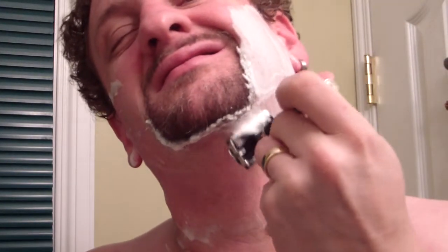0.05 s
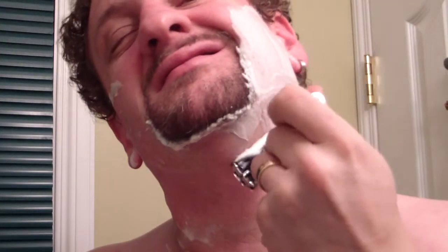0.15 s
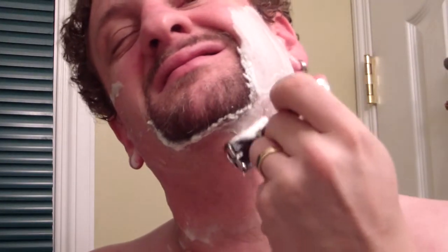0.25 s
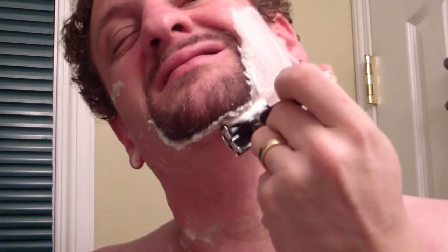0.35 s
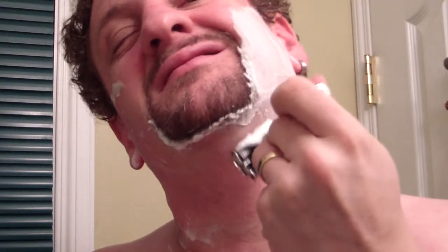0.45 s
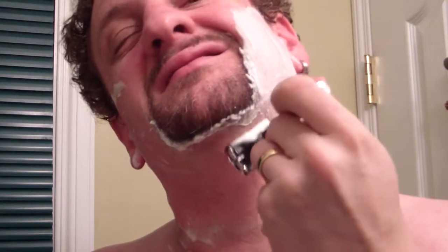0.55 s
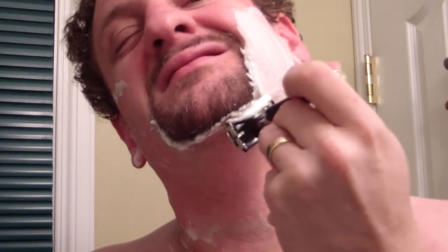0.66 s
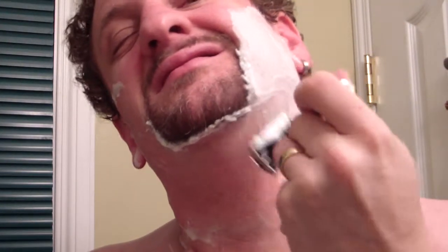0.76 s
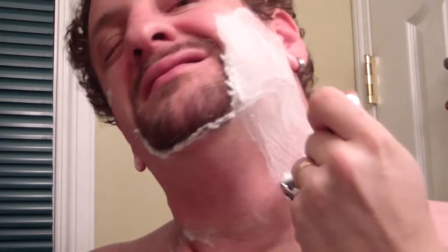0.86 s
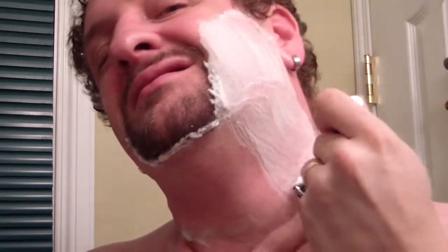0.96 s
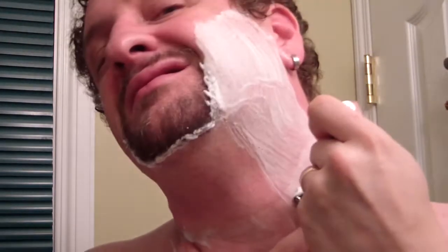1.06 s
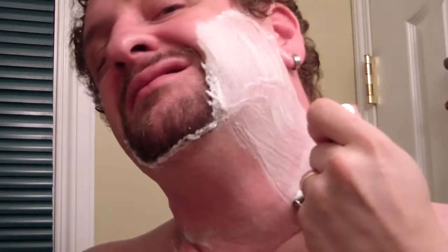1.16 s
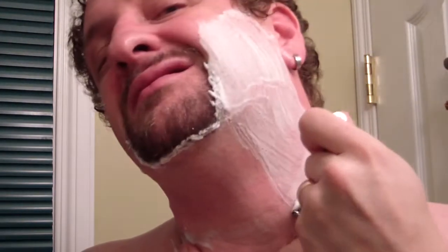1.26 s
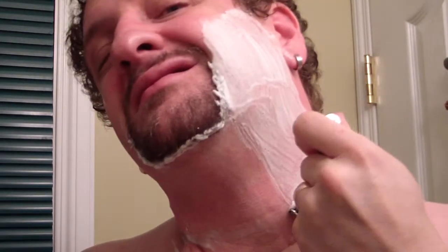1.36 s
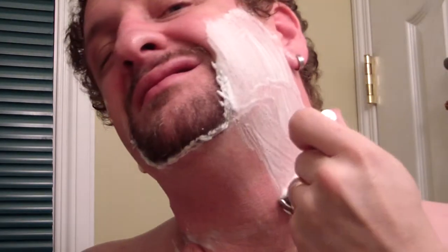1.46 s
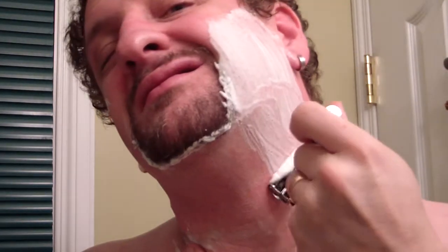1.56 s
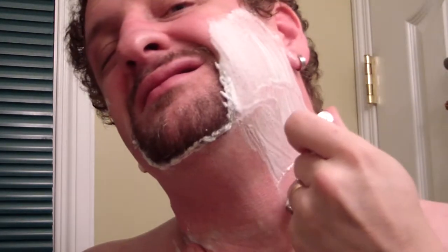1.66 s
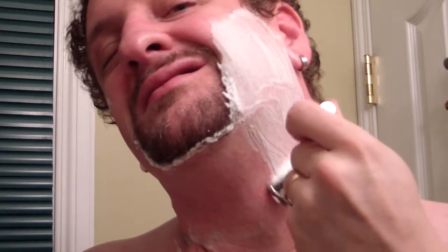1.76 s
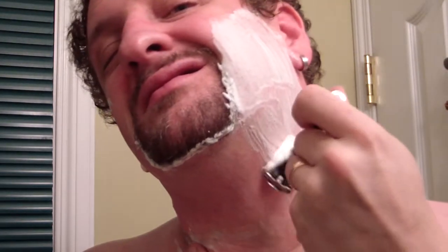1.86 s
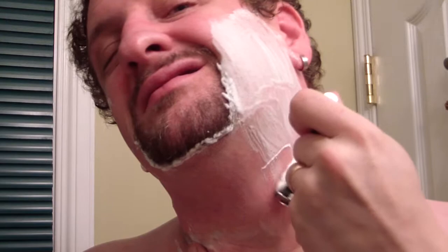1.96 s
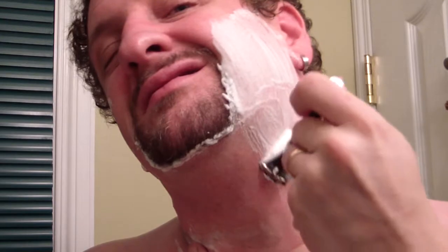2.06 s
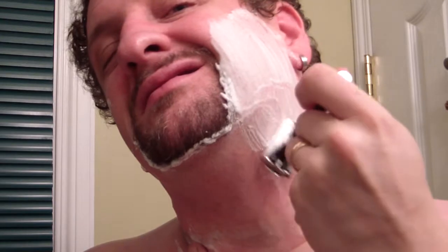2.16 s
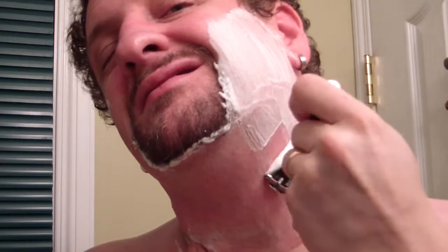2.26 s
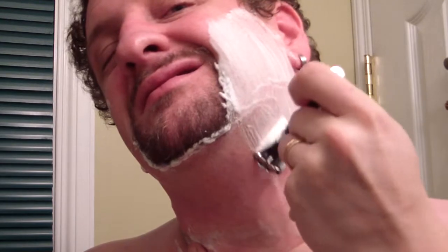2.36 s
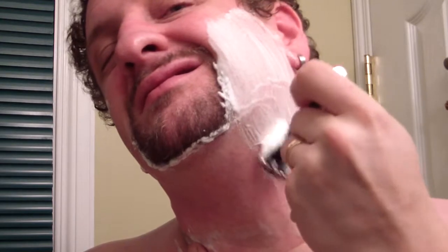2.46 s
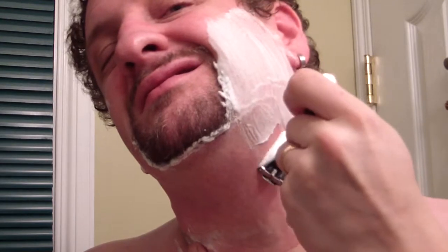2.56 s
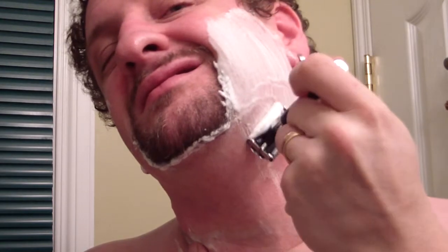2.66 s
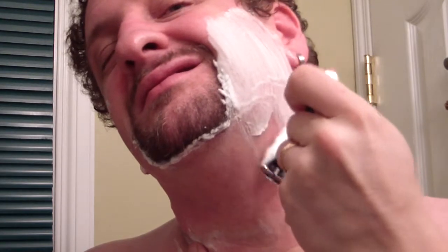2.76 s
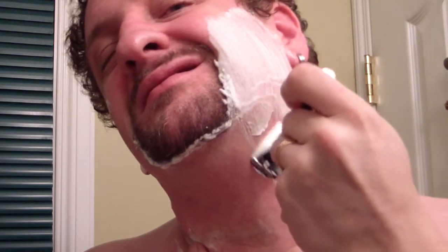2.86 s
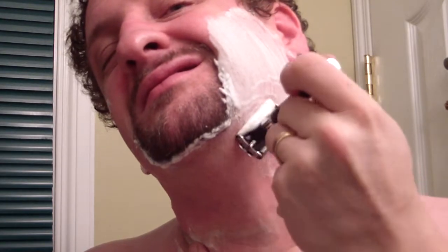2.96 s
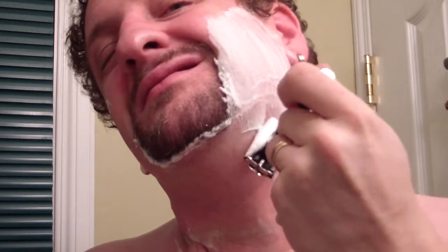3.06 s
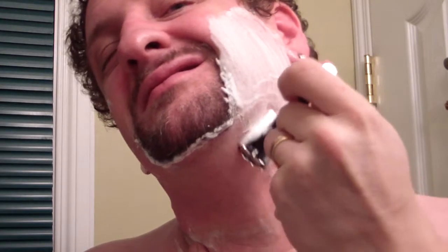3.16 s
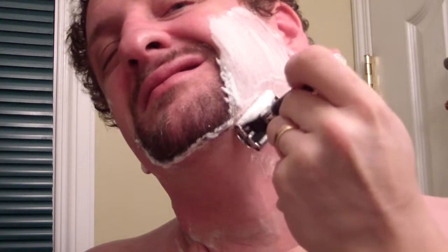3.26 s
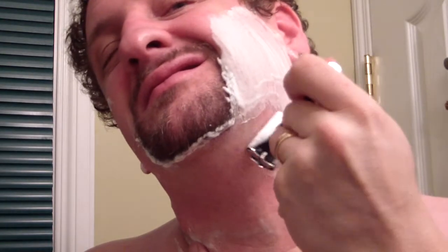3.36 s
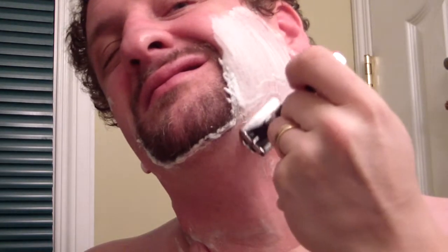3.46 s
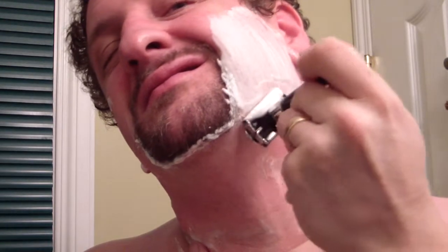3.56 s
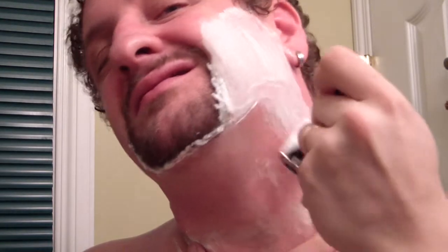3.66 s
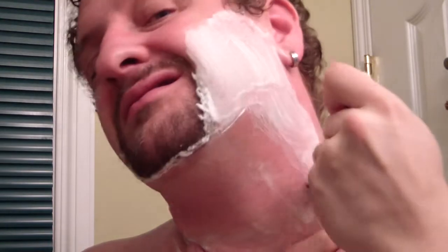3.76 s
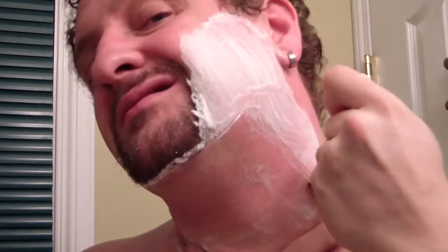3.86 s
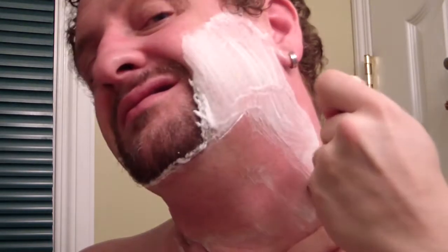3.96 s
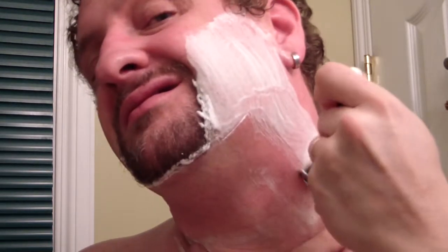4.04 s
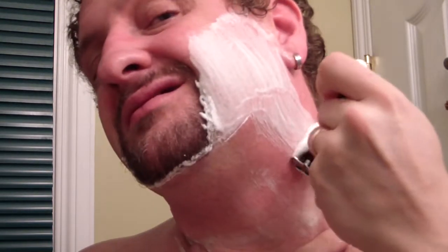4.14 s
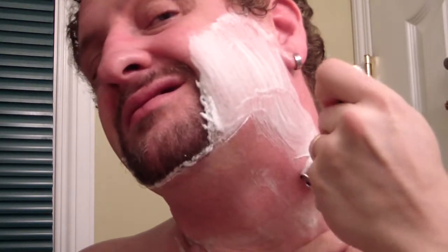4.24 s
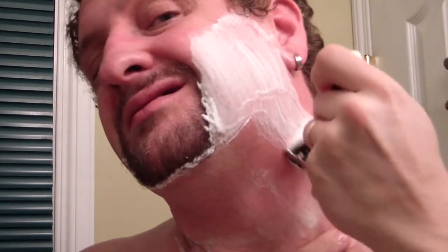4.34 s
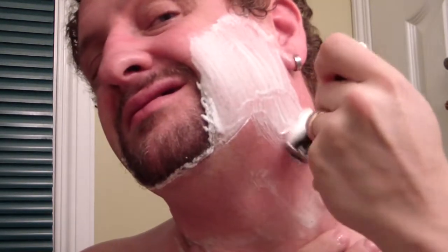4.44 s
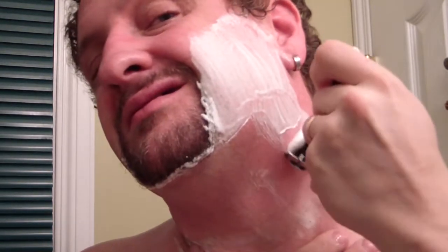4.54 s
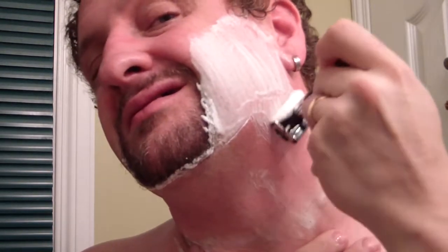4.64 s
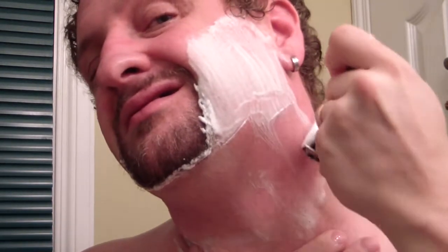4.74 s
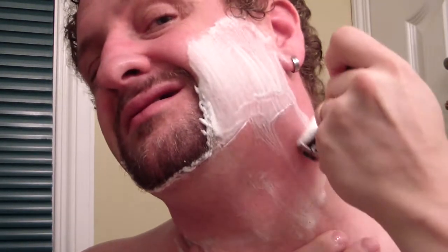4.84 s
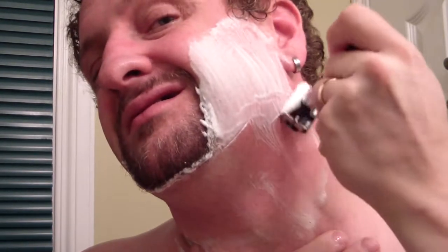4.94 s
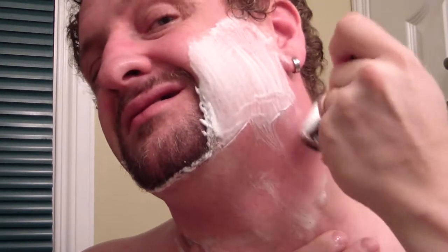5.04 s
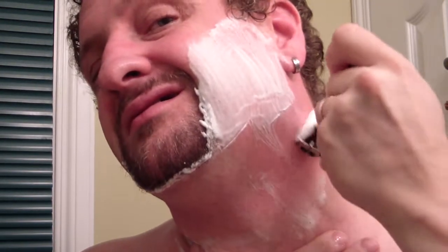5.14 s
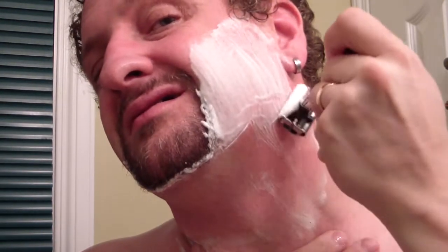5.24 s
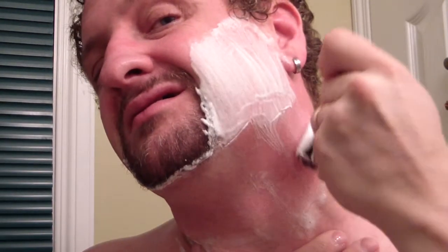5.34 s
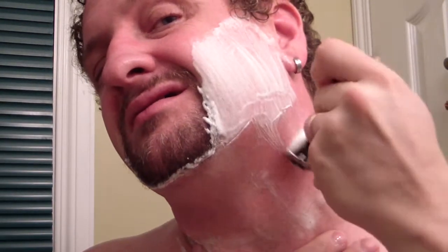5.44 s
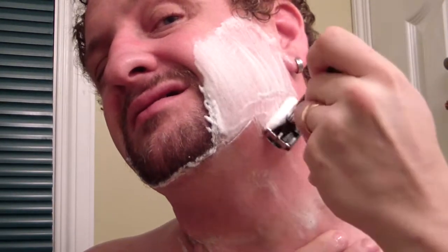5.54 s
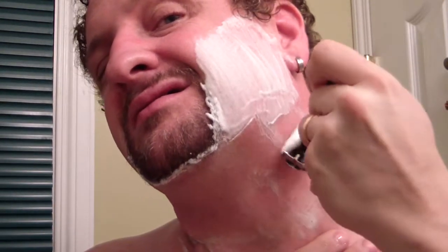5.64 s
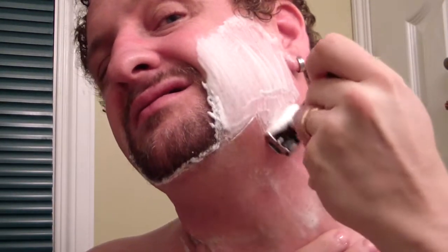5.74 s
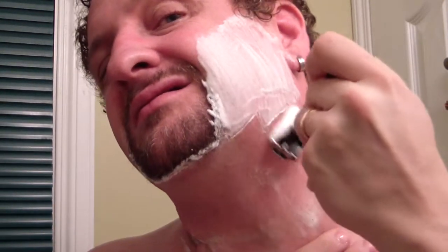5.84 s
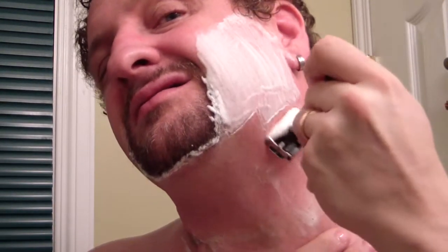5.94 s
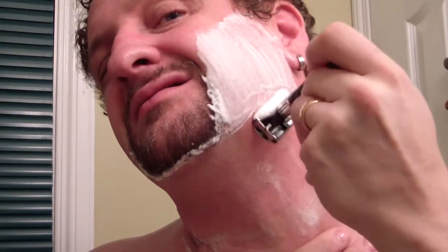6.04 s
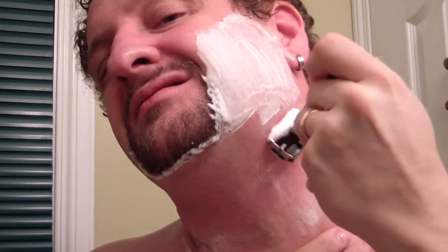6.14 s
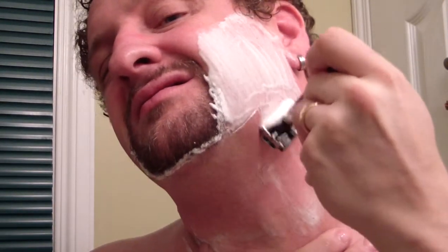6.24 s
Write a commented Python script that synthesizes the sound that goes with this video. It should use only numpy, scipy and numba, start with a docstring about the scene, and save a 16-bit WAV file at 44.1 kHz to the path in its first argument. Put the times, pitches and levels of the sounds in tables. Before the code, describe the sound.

Close to the microphone, a razor scrapes stubble in short gritty strokes, roughly three or four a second. A soft dull bump comes early, then two weaker, fizzier strokes and a short gap before brisk, stronger scraping resumes. Tiny lather pops tick between strokes. A small hard-walled bathroom adds short bright echoes over steady hiss, low rumble, mains hum and a faint distant engine.

```python
"""Wet shave in a small bathroom

A safety razor shaves lathered stubble in short strokes, close to the microphones.
Each cut hair is a click that rings the skin and the razor head; lather pops and crackles at set moments.
A dull bump, built from fading panel tones and rumble, sounds once, and the razor guard squeaks briefly.
The hard walls add short echoes; under it all lie microphone hiss, low rumble, mains hum and a far engine."""
import sys
import numpy as np
from scipy import signal
from scipy.fft import rfft, irfft
from scipy.io import wavfile
from scipy.ndimage import uniform_filter1d
from numba import njit

SR = 44100
rng = np.random.default_rng(int(sys.argv[2]) if len(sys.argv) > 2 else 0)


def dump(signal):
    """Clip the signal to [-1, 1] and save it as 16-bit WAV at the path in sys.argv[1]."""
    limited = np.clip(np.atleast_2d(signal).T, -1, 1)
    pcm = np.round(limited * 32767).astype(np.int16)
    wavfile.write(sys.argv[1], SR, pcm)


N = 277830
TIME = np.arange(N) / SR  # seconds
TOP_HZ = 15900  # where the recorder's treble cut begins

# razor strokes, lower in pitch on the slack neck; levels are relative:
# (start_s, attack_s, hold_s, rasp_db, crispness_db, skin_pitch_hz, skin_width_hz, fizz_against_hairs_db)
STROKE_TABLE = [ (-.035, 0.034, 0.034, -45, -39, 2680, 1000, -16),
                (0.263, 0.019, 0.11, -47, -43, 2750, 900, -21),
                (0.599, 0.046, 0.089, -44.5, -41, 2430, 1100, -18),
                (0.858, 0.059, 0.091, -55.5, -53, 1500, 1300, 5),
                (1.398, 0.14, 0.031, -53, -55, 2380, 1200, 2),
                (1.756, 0.087, 0.026, -52, -46, 2500, 1400, 1.5),
                (2.057, 0.018, 0.076, -45.5, -41.5, 2330, 600, -1.5),
                (2.333, 0.066, .040, -43.5, -40.5, 2360, 400, -5.5),
                (2.622, 0.05, 0.038, -40.5, -37, 2448, 451.3, 0),
                (2.902, .022, 0.079, -41, -38.5, 2260, 1190, -2),
                (3.196, 0.019, 0.065, -40, -41, 2350, 900, -16),
                (3.468, 0.021, 0.077, -43, -43.5, 2200, 900, -15),
                (4.035, 0.054, 0.055, -47.5, -48.5, 2070, 1100, 4),
                (4.329, 0.067, 0.036, -44.5, -45, 1965, 1300, 2),
                (4.598, 0.054, 0.036, -45, -43, 2172, 1000, -2),
                (4.890, 0.046, .030, -45.5, -45.5, 2080, 1000, 1),
                (5.192, 0.042, .038, -44.5, -49.5, 2000, 1124, 4),
                (5.488, 0.037, 0.044, -40, -46.5, 1760, 810, 1),
                (5.747, 0.037, 0.025, -43, -47, 1920, 1140, -7),
                (5.990, 0.073, .012, -43, -42.5, 2087, 1200, -3),
                (6.274, .020, .050, -43.5, -40, 2330, 900, -1), ]
# tone colour of crackling lather: (pitch_hz, relative_level_db)
LATHER_COLOUR = [(800, -12), (3000, -5), (5500, -9), (7500, -1.5), (9500, -3.5), (12500, 1.5),
                 (16000, -0.5)]


def undb(db):
    """Turn decibels into a plain gain."""
    return 10 ** (np.asarray(db) / 20)


def unit(x):
    """Scale to an rms (average strength) of 1."""
    return x / np.sqrt(np.mean(x ** 2))


def on_log_axis(points, size):
    """Read (hz, value) points at each frequency of a transform, evenly by pitch."""
    hz, value = np.transpose(points)
    return np.interp(np.log(np.fft.rfftfreq(size, 1 / SR) + 1), np.log(hz), value)


def colour(x, points):
    """Filter through (hz, db) points without sounding early, so that clicks keep their attack."""
    size = 2 * N
    # folding the cepstrum (transform of the log gain) forward in time makes the filter minimum-phase
    cepstrum = irfft(np.log(undb(on_log_axis(points, size))))
    cepstrum[1:N] *= 2
    cepstrum[N + 1:] = 0
    response = np.exp(rfft(cepstrum))
    return irfft(rfft(x, size) * response)[..., :N]


def noise_pair(likeness, size):
    """Make left and right noise with a given likeness (correlation) at each frequency."""
    c = np.clip(on_log_axis(likeness, size), -1, 1)
    weights = np.sqrt([(1 + c) / 2, (1 - c) / 2])
    mid, side = rfft(rng.standard_normal((2, size))) * weights
    return irfft([mid + side, mid - side], size)


@njit
def svf(x, hz, width):
    """State-variable band-pass: two linked stores pass energy back and forth, as in a resonator."""
    y, b, l = np.empty(len(x)), 0., 0.
    for i in range(len(x)):
        g, k = np.tan(np.pi * hz[i] / SR), width[i] / hz[i]
        v = (b + g * (x[i] - l)) / (1 + g * (g + k))
        b, l, y[i] = 2 * v - b, l + 2 * g * v, k * v
    return y


def resonate(x, hz, width_hz):
    """Ring one resonance, gain 1 at its centre; centre and width may move."""
    return svf(x, hz * np.ones(N), width_hz * np.ones(N))


def snaps(rate, spread_db):
    """Random clicks, `rate` a second on average, many small and a few large, at a steady mean power."""
    chance = rng.random(N)
    size = np.minimum(rng.exponential(size=N), 4.5)
    sign = rng.choice([-1, 1], N)
    clicks = (chance < rate / SR) * sign * undb(spread_db * size)
    power = uniform_filter1d(clicks ** 2, size=900)  # over about 20 ms
    return clicks / np.sqrt(np.abs(power) + 1e-9)


def strokes(attack_power=1.04, lift_s=.07, rasp_release_db_per_s=213, crisp_release_db_per_s=235,
            crisp_sag_db_per_s=5):
    """Each stroke presses in, holds, eases off and lifts; crispness sags as the blade clogs with lather."""
    rasp, crisp = np.zeros(N), np.zeros(N)
    for start, attack, hold, rasp_db, crisp_db, *_ in STROKE_TABLE:
        # the blade leaves the skin lift_s after the hand starts to ease off
        touching = (TIME >= start) & (TIME < start + attack + hold + lift_s)
        age = TIME[touching] - start
        press = np.minimum(age / attack, 1) ** attack_power
        easing = np.maximum(age - attack - hold, 0)
        rasp[touching] += press * undb(rasp_db - rasp_release_db_per_s * easing)
        crisp_now_db = crisp_db - crisp_sag_db_per_s * age - crisp_release_db_per_s * easing
        crisp[touching] += press * undb(crisp_now_db)
    return rasp, crisp


def skin_patch():
    """Skin pitch, its width and lather fizz under the blade, gliding from mid-stroke to mid-stroke."""
    start, attack, hold, _, _, *patch = np.transpose(STROKE_TABLE)
    middle = start + attack + hold / 2
    return [np.interp(TIME, middle, column) for column in patch]


def razor():
    """Hairs snap at the edge and ring the skin and the razor head; squeezed lather fizzes."""
    # ringing tones of the razor head: (pitch_hz, width_hz, relative_level_db)
    head_modes = [(1750, 24, -6), (1850, 20, -20), (2098, 11, -0.5), (2294, 45, -6.5), (2450, 44, 3.5),
                  (2860, 640, -3.5), (3050, 25, -7), (3175, 19, 0), (3573, 55, -4.5), (3920, 120, 0.5),
                  (4540, 210, -10)]
    # tone colour of a hair snapping: (pitch_hz, relative_level_db)
    snap_colour = [(500, -18.5), (1200, -13.5), (1800, -11.5), (2400, -4.5), (3000, 7), (4200, 5),
                   (5200, 2.5), (6300, 3.5), (7800, 2.5), (9500, 0), (13000, -1.5), (16000, -4)]
    rasp_gain, crisp_gain = strokes()
    skin_hz, skin_width, fizz_db = skin_patch()
    # stubble stands in tufts, so the snaps come in uneven bunches
    unevenness = unit(resonate(rng.standard_normal(N), 67, width_hz=120))
    tufts = unit(undb(0.78 * unevenness))
    hairs = tufts * snaps(rate=5000, spread_db=4)
    rub = undb(2) * tufts * rng.standard_normal(N)  # the guard rubs through the lather
    drag = unit(hairs + rub)
    tug = resonate(drag, skin_hz, width_hz=2100)  # the give of the skin softens each tug
    skin = resonate(tug, skin_hz, skin_width) / np.sqrt(skin_width)
    head = sum(undb(db) * resonate(tug, hz, width) for hz, width, db in head_modes)
    rasp = unit(unit(skin) + undb(-3.5) * unit(head))
    fizz = undb(fizz_db) * unit(colour(snaps(rate=5000, spread_db=5.5), LATHER_COLOUR))
    # the division keeps the total strength steady however much fizz there is
    crisp = (unit(colour(hairs, snap_colour)) + fizz) / np.sqrt(1 + undb(fizz_db) ** 2)
    return undb(-2.5) * rasp_gain * rasp + undb(0.84) * crisp_gain * crisp


def mic_noise():
    """Microphone hiss and low rumble: shaped noise that differs between left and right."""
    # tone colour of the hiss and rumble: (pitch_hz, relative_level_per_hz_db)
    hiss_colour = [(12, -32), (20, -1), (101, -5), (175, -7.5), (416, -12.5), (932, -17), (1630, -19.5),
                   (1870, -19.5), (2090, -21), (2330, -20), (2540, -20), (3750, -20), (4550, -22),
                   (7310, -23.5), (15500, -26)]
    # how alike left and right are: (pitch_hz, correlation)
    hiss_likeness = [(30, 0.27), (100, 0.15), (250, 0.088), (500, 0.049), (2000, 0.1), (12000, 0.06)]
    return undb(-48.7) * unit(colour(noise_pair(hiss_likeness, N), hiss_colour))


def mains_hum():
    """Mains hum near 120 and 240 Hz, with a few other low steady tones: noise through narrow resonances."""
    # hum and other low tones: (pitch_hz, first_resonance_width_hz, rms_level_db)
    hum_tones = [(80, 20, -63), (120.54, 2.8, -63.5), (120.1, 19, -61.5), (208.8, 4.8, -74.5),
                 (238, 3.2, -70.5), (422.5, 14, -74.5)]
    hum = np.zeros(N)
    for hz, width, db in hum_tones:
        narrow = resonate(rng.standard_normal(N), hz, width)
        hum += undb(db) * unit(resonate(narrow, hz, 2 * width))
    return hum


def lather(peak_s=0.00026, crackle_s=0.011, scatter=0.11):
    """A film of lather parts with a pop of a few tiny bubbles, then the foam crackles and fades."""
    # ticks as the razor lands and lifts: (start_s, relative_level_db, crackle_against_pop_db)
    tick_times = [(0.279, -41, -17), (.479, -53.5, -6), (.7615, -35.5, -18), (1.666, -49.5, -12.5),
                  (1.9273, -40.5, -16.5), (2.0732, -38, -24), (2.348, -47, -10), (2.5208, -47, -9),
                  (2.9135, -44, -16), (3.213, -46, -13), (3.6088, -46, -8), (3.8717, -53, -12),
                  (4.2388, -38, -12), (4.451, -45, -13), (4.4665, -42, -20), (4.505, -54, -3.5),
                  (4.7406, -45.5, -8.5), (4.78, -47, -16), (5.0621, -38, -16.5), (5.312, -49.5, -9),
                  (5.335, -46.5, -20), (5.375, -49, -16), (5.6484, -46, -9.5), (5.89, -42.5, -15),
                  (6.0738, -37.5, -12.5), (6.2825, -38, -18)]
    # the small bubbles that ring in one tick: (pitch_hz, relative_level_db)
    bubbles = [(7400, -3), (10400, -0.5), (13300, -1.5), (15000, -7)]
    pops, crackle = np.zeros(N), np.zeros(N)
    hz, bubble_db = np.transpose(bubbles)
    for start, db, crackle_db in tick_times:
        first = int(start * SR)
        age = TIME[:min(N - first, SR // 8)]
        span = slice(first, first + len(age))
        # each bubble gets its own random pitch shift and starting point in its cycle
        size, turn = rng.uniform(-1, 1, (2, len(hz), 1))
        bubble_hz = hz[:, None] * (1 + scatter * size)
        ring = undb(bubble_db) @ np.sin(2 * np.pi * (bubble_hz * age + turn))
        burst = age / peak_s * np.exp(1 - age / peak_s)
        pops[span] += undb(db) * ring * burst
        crackle[span] += undb(db + crackle_db) * np.exp(-age / crackle_s)
    foam = snaps(rate=6000, spread_db=4.5)
    return undb(7.0) * pops + undb(16) * colour(crackle * foam, LATHER_COLOUR)


def bump(thud_t60_s=0.55):
    """A soft blow and its rattles shake a wooden panel, with a dull rumble that fades by 60 dB in t60."""
    # the blow and its rattles: (start_s, relative_level_db)
    blows = [(.399, 1.5), (.414, 4.5), (.426, 1.5), (.455, -3.5), (0.477, -6)]
    # ringing tones of the panel: (pitch_hz, fade_by_60_db_s, relative_level_db)
    panel_modes = [(62.7, 0.45, -10), (137.5, 0.3, 6.5), (251, .4, -4), (326, 0.39, 0), (420.3, 0.46, 5),
                   (494, .25, -14), (935, 0.13, -6), (1015, 0.11, -19)]
    # tone colour of the rumble: (pitch_hz, relative_level_db)
    thud_colour = [(40, -2.5), (130, 5), (260, -1), (460, -9), (650, -21), (1050, -24), (1500, -42),
                   (4000, -70)]
    ring, shake = np.zeros(N), np.zeros(N)
    for start, db in blows:
        age = np.maximum(TIME - start, 0)
        shake += (age > 0) * undb(db - 60 * age / thud_t60_s)
        for hz, t60, mode_db in panel_modes:
            fade = undb(db + mode_db - 60 * age / t60)
            ring += fade * np.sin(2 * np.pi * hz * age)
    rumble = shake * unit(colour(rng.standard_normal(N), thud_colour))
    return undb(-52.5) * ring + undb(-53.5) * rumble


def engine():
    """A far engine pulls up and eases off: one pure tone whose pitch and level glide."""
    # path of the drone: (time_s, pitch_hz, rms_level_db)
    drone_path = [(1.0, 105.4, -87), (1.27, 115.1, -52), (1.45, 123.6, -55), (1.8, 128.6, -53.5),
                  (2.47, 133, -52.5), (2.65, 135.3, -60.5), (3.0, 140.4, -67), (4.3, 141, -64),
                  (4.55, 138.7, -57.5), (4.8, 132, -55), (5.08, 130.8, -53), (5.25, 133, -62),
                  (6.3, 133.2, -61)]
    s, *columns = np.transpose(drone_path)
    hz, db = (np.interp(TIME, s, column) for column in columns)
    return undb(db) * np.sqrt(2) * np.sin(2 * np.pi * np.cumsum(hz) / SR)


def squeaks():
    """The guard sticks and slips on wet skin for a moment and sings one note that swells and fades."""
    # squeaks: (middle_s, pitch_hz, time_from_middle_to_37_percent_s, peak_level_db)
    squeak_notes = [(1.467, 3780, 0.006, -50), (4.741, 1507, 0.021, -52), (5.838, 1508, 0.016, -52)]
    song = np.zeros(N)
    for middle, hz, length, db in squeak_notes:
        swell = np.exp(-((TIME - middle) / length) ** 2)
        song += undb(db) * swell * np.sin(2 * np.pi * hz * TIME)
    return song


def bathroom(x, t60_s=0.26, wet_db=-5.0, treble_db=3, gap_s=0.0011, count=4):
    """Hard walls ring briefly; their echoes blend through `count` patterns as the hand moves."""
    # how alike the left and right echoes are: (pitch_hz, correlation)
    room_likeness = [(200, 0.99), (2200, 0.98), (3100, 1), (5000, 1), (8000, 0.1), (11000, 0.23),
                     (15000, -0.71)]
    age = TIME[:SR // 2]
    decay = np.exp(-np.log(1000) * age / t60_s) * (age > gap_s)  # down 60 dB at t60_s
    decay *= undb(wet_db) / np.sqrt(np.sum(decay ** 2))
    thrown = colour(x, [(3000, 0), (12000, treble_db)])  # the treble is beamed at the walls
    place = np.linspace(0, count - 1, N)
    out = x
    for k in range(count):
        share = np.sqrt(np.maximum(1 - np.abs(place - k), 0))
        tail = noise_pair(room_likeness, len(age)) * decay
        out = out + signal.fftconvolve([share * thrown], tail, axes=1)[:, :N]
    return out


def ports(pair, lag_samples=0.21, shade_db=1.0):
    """The razor is slightly nearer the right port: the left hears it later and a little duller."""
    hz = np.fft.rfftfreq(N, 1 / SR)
    delay = np.exp(-2j * np.pi * hz * lag_samples / SR)
    shade = undb(-shade_db * hz / TOP_HZ)  # loses shade_db at TOP_HZ
    left = irfft(rfft(pair[0]) * delay * shade, N)
    return np.array([left, pair[1]])


def scene():
    """Everything near the mirror rings in the room, over the background."""
    near = razor() + lather() + bump() + squeaks()
    background = mic_noise() + mains_hum() + engine()
    return ports(bathroom(near)) + background


def record(dry):
    """The recorder cuts the top: a steep low-pass with 0.2 dB ripple below and 70 dB loss above."""
    top_cut = signal.ellip(10, .2, 70, TOP_HZ, fs=SR, output="sos")
    return signal.sosfilt(top_cut, dry)


dry = scene()
out = record(dry)
dump(out)
```